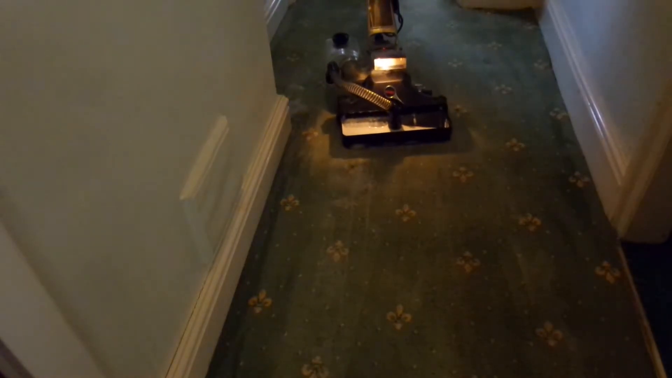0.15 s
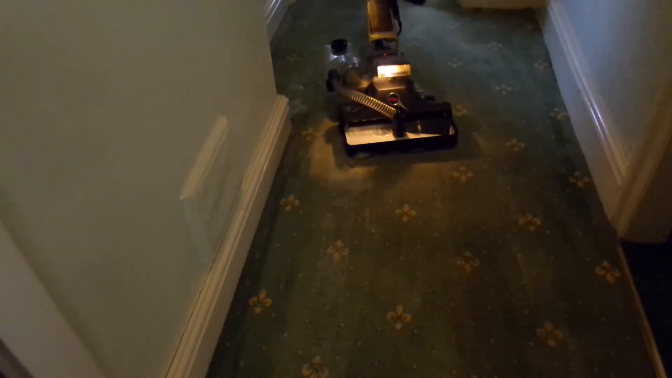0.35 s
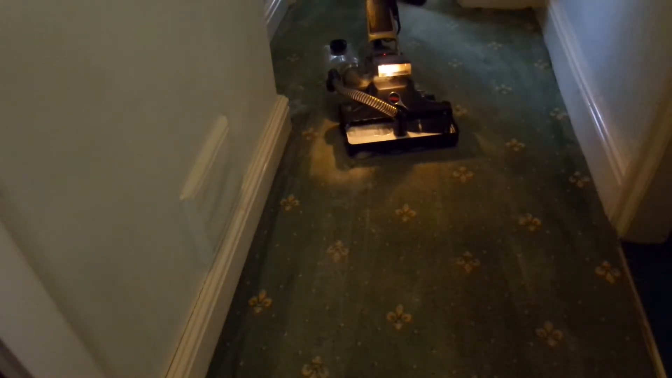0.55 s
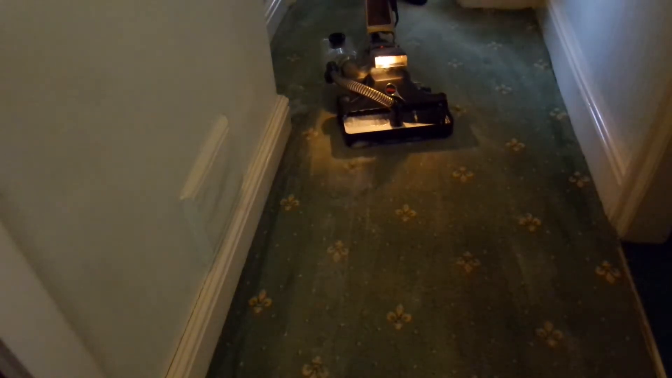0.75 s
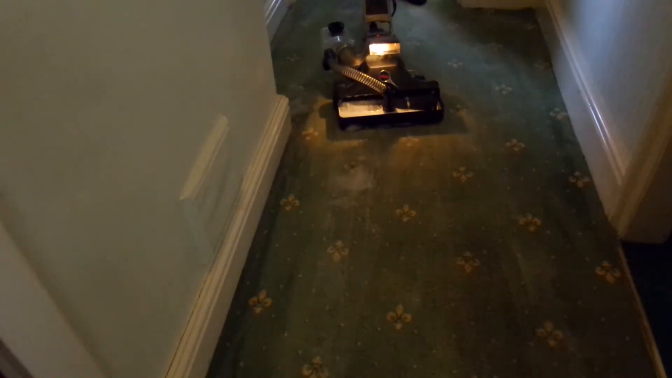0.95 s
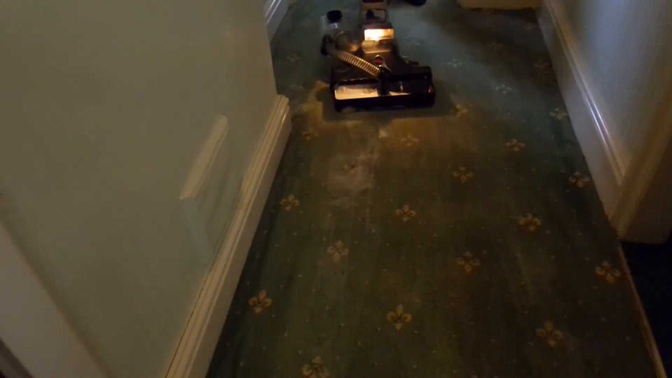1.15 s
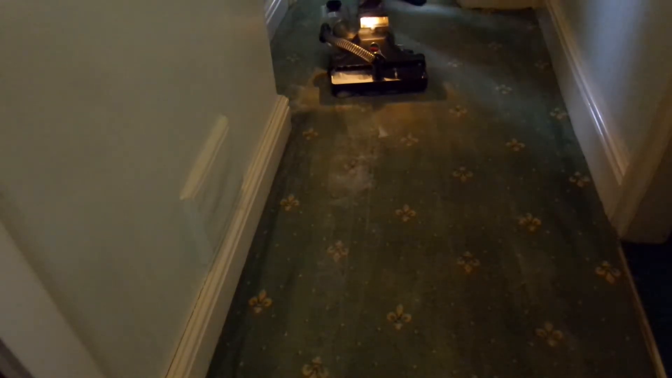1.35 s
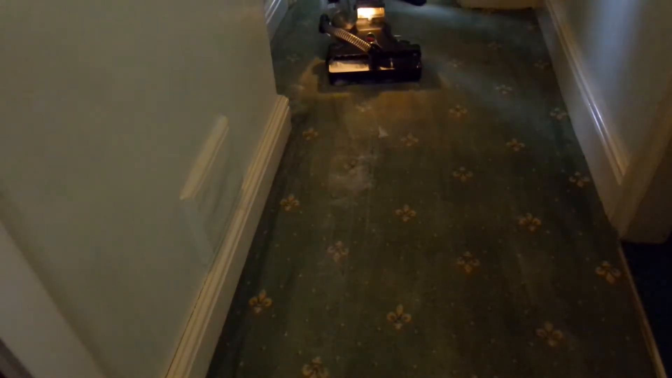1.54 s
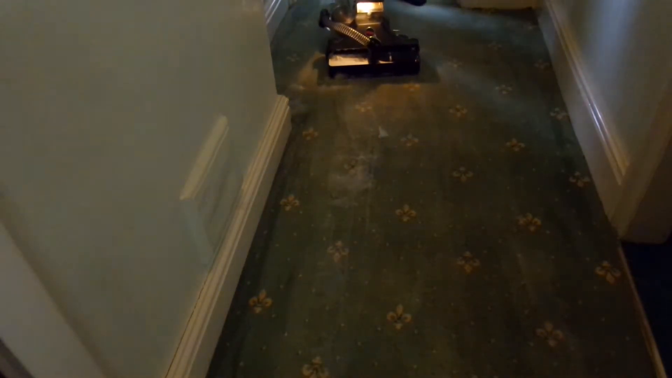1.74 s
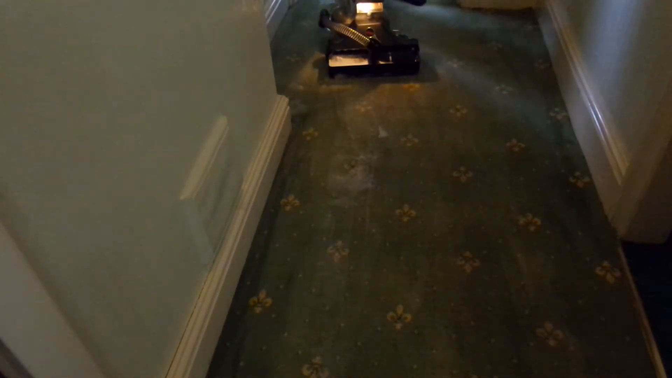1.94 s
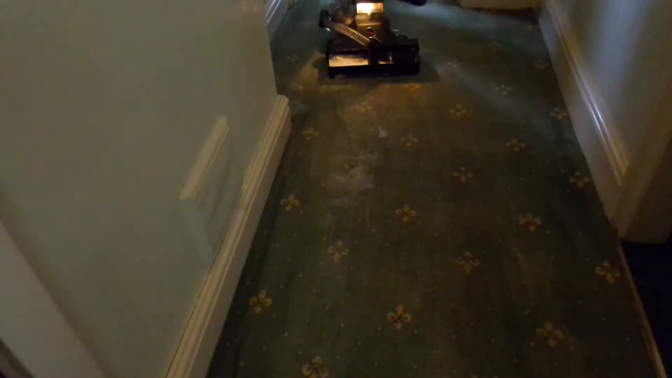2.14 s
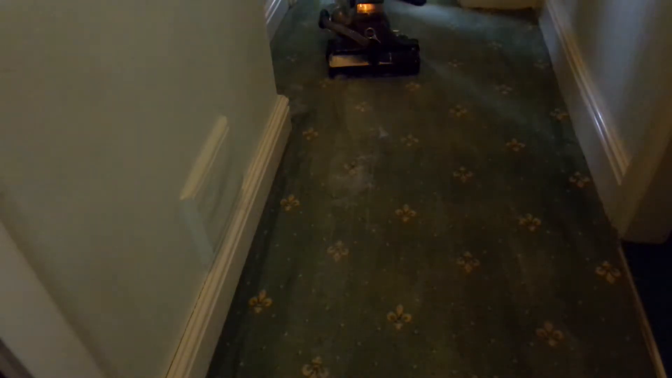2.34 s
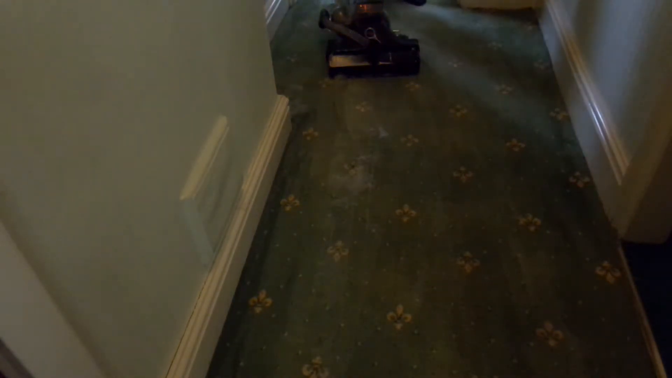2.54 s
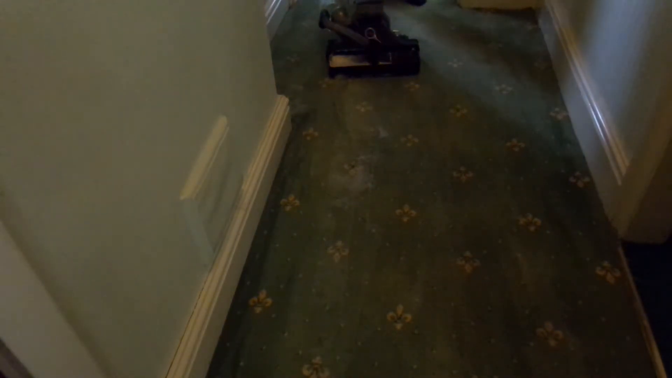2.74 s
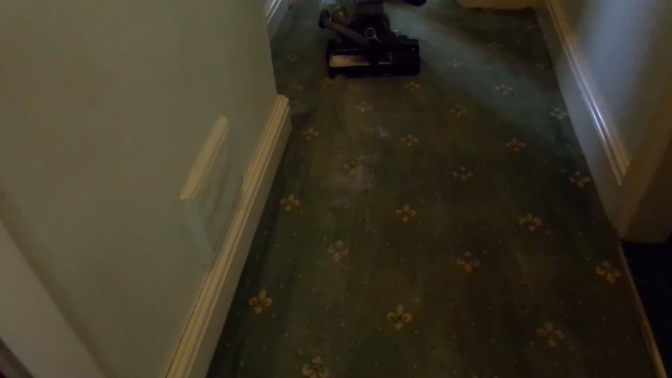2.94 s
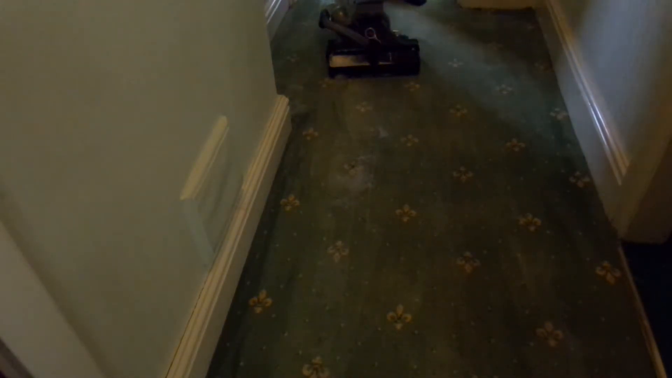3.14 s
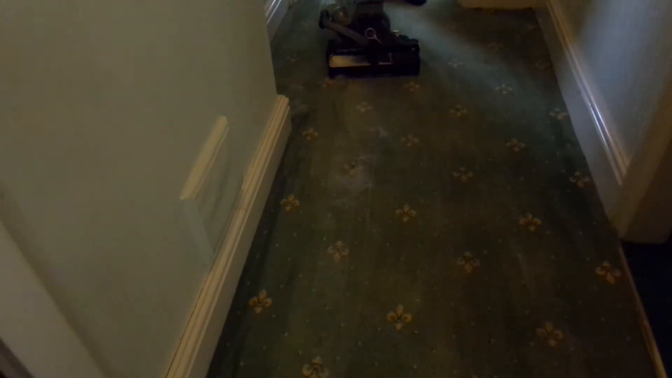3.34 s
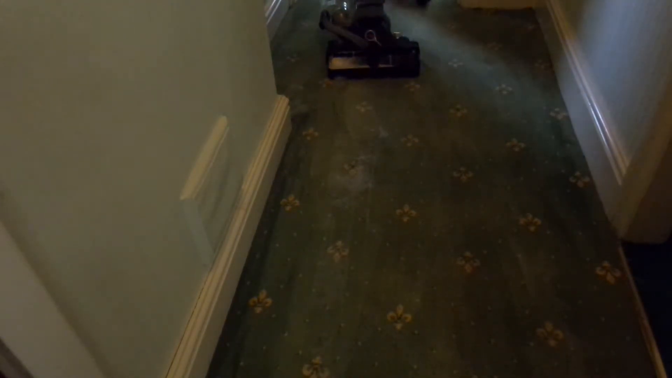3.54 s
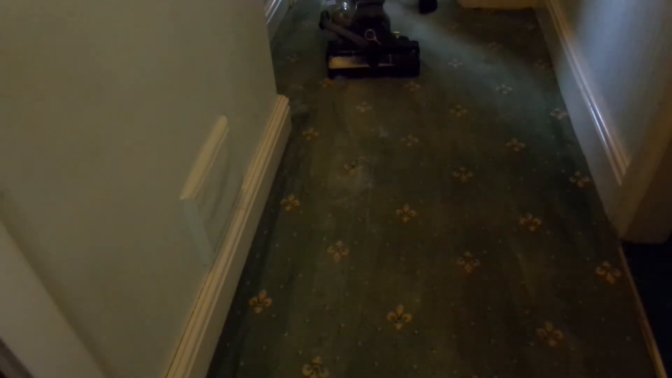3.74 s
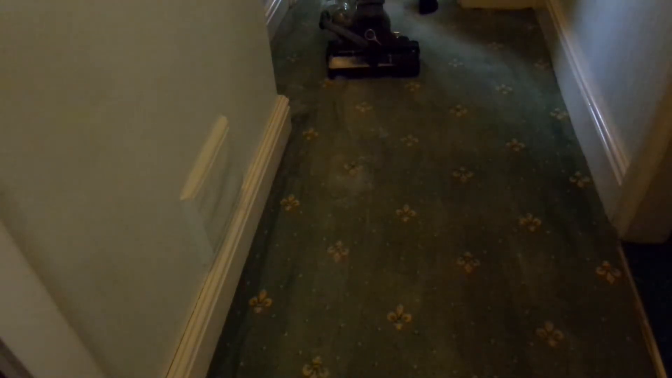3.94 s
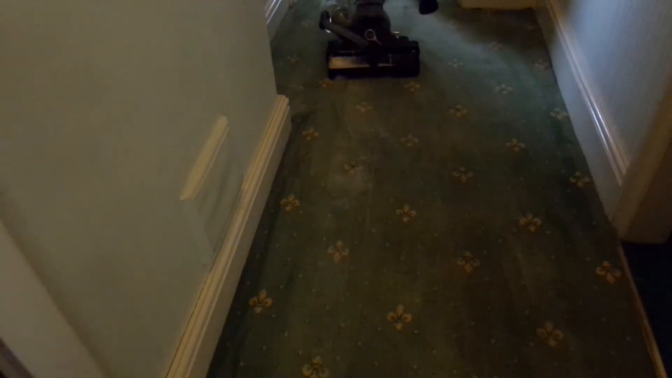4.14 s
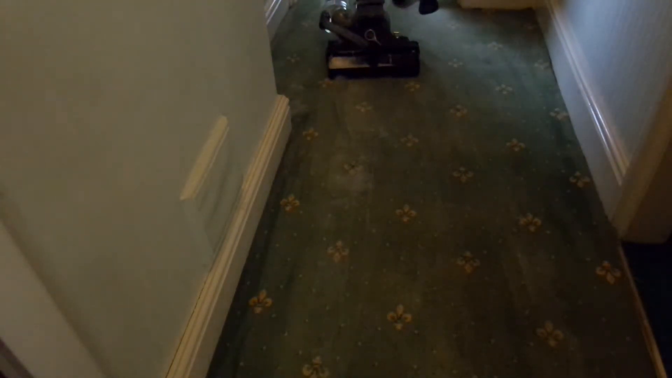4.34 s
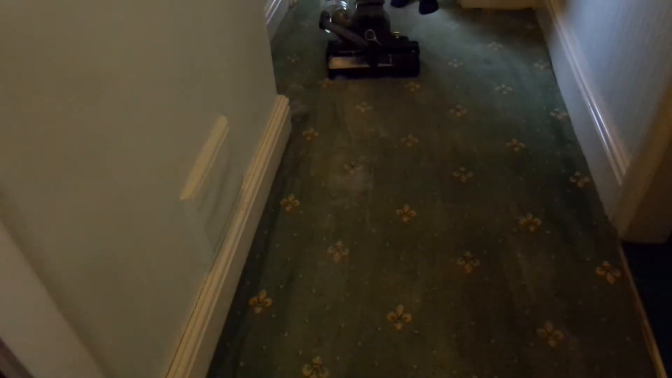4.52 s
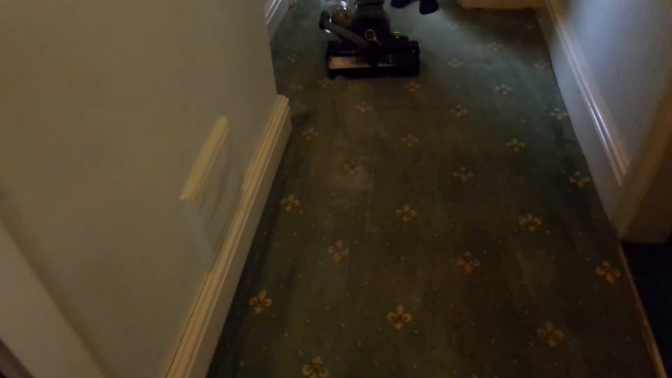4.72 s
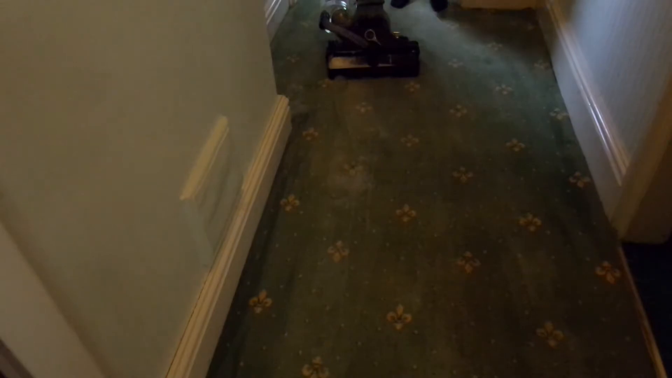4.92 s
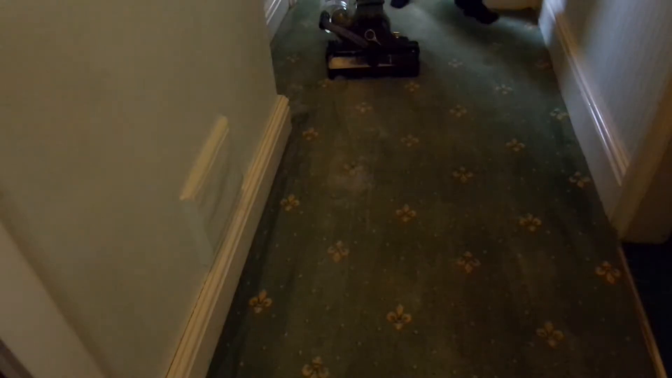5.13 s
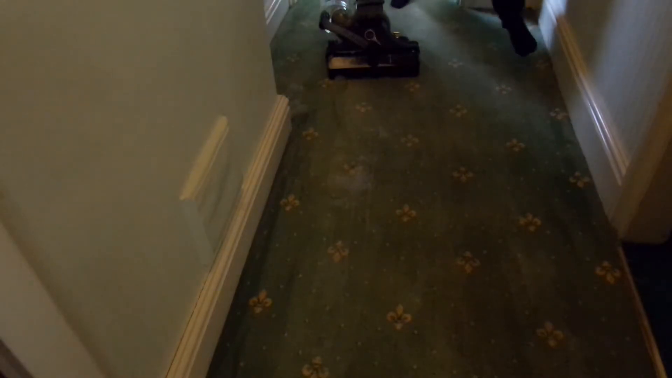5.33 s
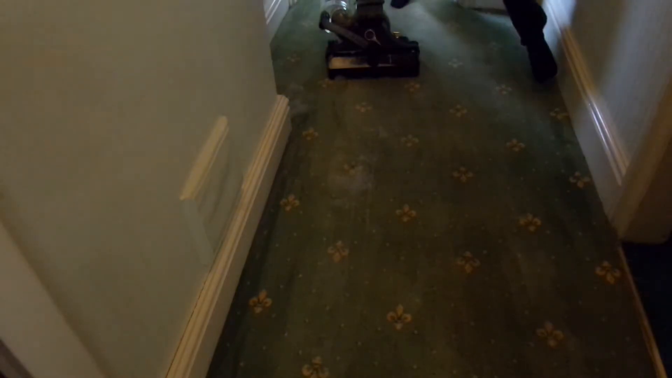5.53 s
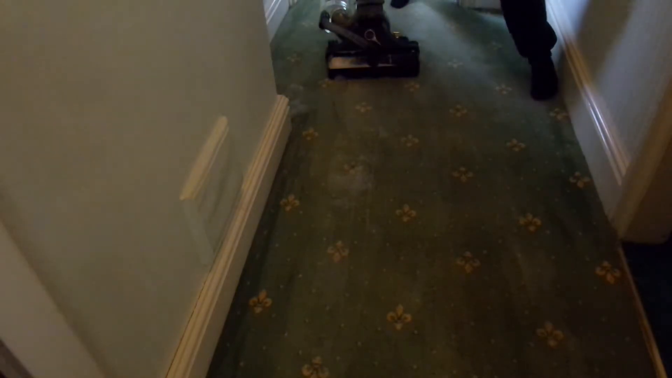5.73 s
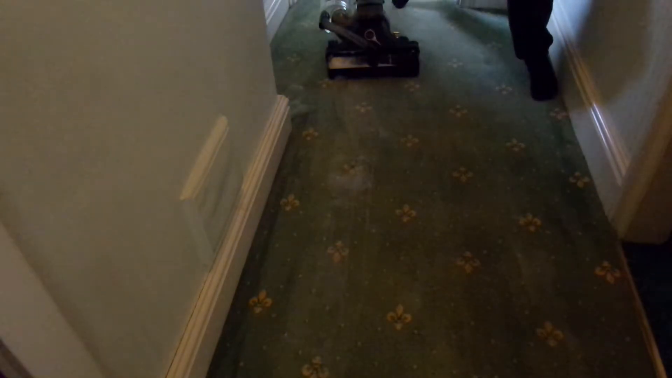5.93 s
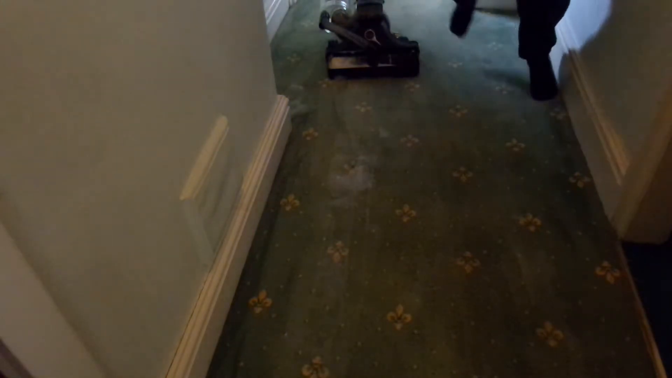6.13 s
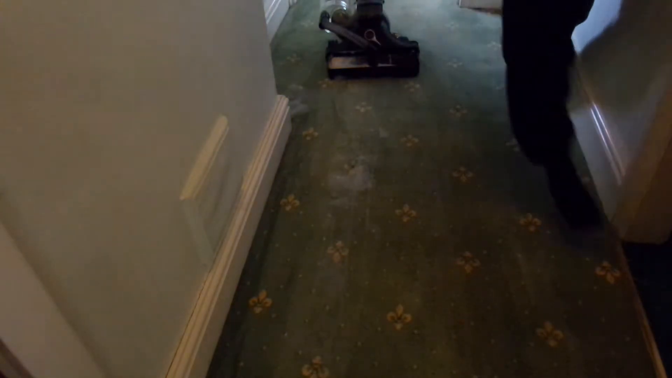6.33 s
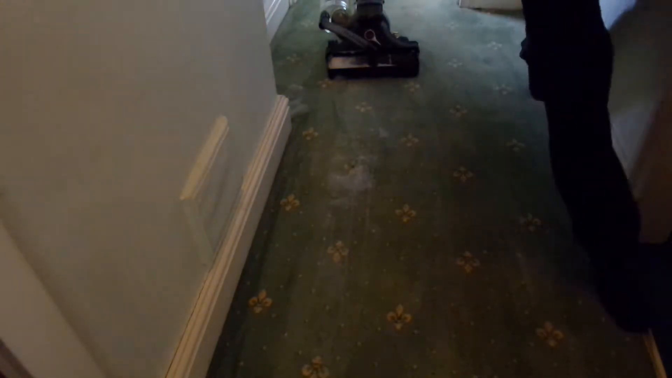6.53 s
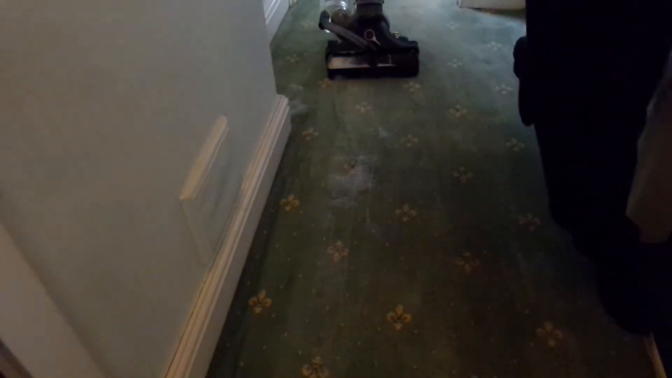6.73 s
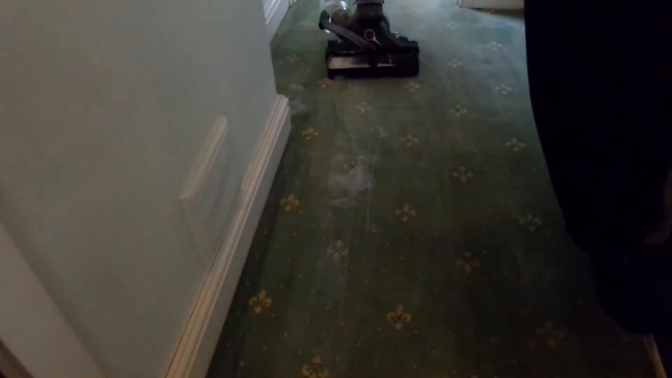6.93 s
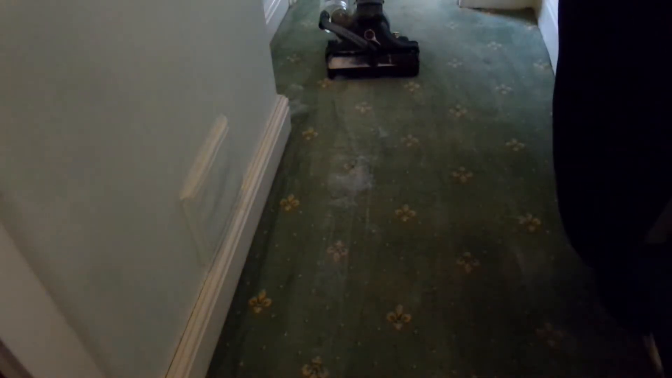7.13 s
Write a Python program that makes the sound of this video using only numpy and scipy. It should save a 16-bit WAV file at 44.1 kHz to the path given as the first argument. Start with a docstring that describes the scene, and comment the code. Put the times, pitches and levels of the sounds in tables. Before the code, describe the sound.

A vacuum cleaner rushes and whines in a hallway, then spins down, followed by plastic clacks and a few muffled approaching footsteps.

```python
"""A narrow carpeted hallway, heard from a stereo microphone that stays in one spot.
An upright vacuum cleaner works close by, air rushing under the whine of its fan and brush drive; it
moves off, is switched off and spins down. At the far end its plastic handle clatters and latches
upright. Then someone walks up the hall and past the microphone, thudding on the boards under the
carpet, cloth swishing and a small metal fitting ticking on their clothes."""
import sys
import numpy as np
from scipy import signal
from scipy.fft import rfft, irfft, next_fast_len
from scipy.io import wavfile

SR = 44100
rng = np.random.default_rng(int(sys.argv[2]) if len(sys.argv) > 2 else 0)


def store_pcm(level_fs):
    """Save levels as 16-bit WAV."""
    pcm = np.round(np.clip(level_fs, -1, 1) * 32767).astype(np.int16)
    wavfile.write(sys.argv[1], SR, np.atleast_2d(pcm).T)


N = 320607
TIME = np.arange(N) / SR
SIZE = 2 * next_fast_len(N // 2 + SR // 2, real=True)
HZ = np.maximum(np.arange(SIZE // 2 + 1) * SR / SIZE, 1)
SWITCH_OFF_S, CUTOFF_HZ = 2.19, 15900

# How alike the hall sounds on the two channels. Each row: frequency in Hz, left-right correlation.
LIKENESS = [(30, .92), (100, 0.98), (200, 1), (350, 0.84), (700, 0.69), (1400, 0.08), (2800, 0.041),
            (15000, 0.022)]
# The cleaner's treble sits to the left. Each row: frequency in Hz, left over right in dB.
CLEANER_PAN = [(60, 0.5), (120, 0), (240, -0.5), (480, -0.5), (950, 1.5), (1890, 3.5), (3770, 6),
               (7520, 8.5), (15000, 6)]
# Colour of the turbulence in the housing. Each row: frequency in Hz, relative level in dB.
AIR_COLOUR = [(25, -45), (70, -38), (100, -22), (160, -17.5), (210, -5.5), (360, -3.5), (600, -3),
              (950, -9.5), (1500, -16.5), (2600, -17), (3100, -25.5), (6000, -32), (11500, -37.5),
              (15500, -35)]


def from_db(db):
    """Decibels to amplitude."""
    return 10 ** (np.asarray(db) / 20)


def unit_mid(stereo):
    """Scale a stereo pair so that its middle has rms 1."""
    return stereo / np.sqrt(np.mean(stereo.mean(axis=0) ** 2))


def pan(db):
    """Left and right gains, the left louder by db."""
    return from_db(np.array([[.5], [-.5]]) * db)


def in_time(rows):
    """Each column of a table of timed points, sample by sample."""
    times, *columns = np.transpose(rows)
    return [np.interp(TIME, times, column) for column in columns]


def at_hz(points, hz):
    """Read a table on a log-frequency axis."""
    frequencies, values = np.transpose(points)
    return np.interp(np.log(hz), np.log(frequencies), values)


def to_sound(spectrum):
    """From a spectrum back to samples."""
    return irfft(spectrum, SIZE)[..., :N]


def drift(rate):
    """A random wander of spread 1 that turns about rate times a second."""
    knots = rng.standard_normal(2000)
    return np.interp(TIME * rate, np.arange(len(knots)), knots) / np.sqrt(2 / 3)


def response(colour, peaks=()):
    """Causal (minimum-phase) response of a body with a broad colour and resonances."""
    level_db = at_hz(colour, HZ)
    for hz, width, db in peaks:
        level_db = level_db + db / (1 + (2 * (HZ - hz) / width) ** 2)
    cepstrum = irfft(np.log(from_db(level_db)))
    cepstrum[1:SIZE // 2] *= 2
    cepstrum[SIZE // 2 + 1:] = 0
    return np.exp(rfft(cepstrum))


def diffuse():
    """Spectrum of stereo noise, white in the middle: alike on both sides in the bass, wide on top."""
    alike = np.clip(at_hz(LIKENESS, HZ), -1, 1)
    mid, side = rfft(rng.standard_normal((2, SIZE)))
    return mid + np.sqrt((1 - alike) / (1 + alike)) * side * [[1], [-1]]


def ring(hits, modes):
    """Hits (s, dB) set decaying modes (Hz, dB, t60) ringing, a little differently each time."""
    times, hit_db = np.transpose(hits)
    out, at = np.zeros(N), (times * SR).astype(int)
    for hz, db, t60 in modes:
        clicks = np.full(N, 1e-18)
        clicks[at] = from_db(hit_db + db + rng.normal(0, 1, len(at)))
        decay, angle = from_db(-60 / (t60 * SR)), 2 * np.pi * hz / SR
        out += signal.lfilter([0, np.sin(angle)], [1, -2 * decay * np.cos(angle), decay ** 2], clicks)
    return out


def contacts(rows, body):
    """Spectrum of knocks on a body: each a click and a run of slips, coloured by the part it hits."""
    force, t = np.zeros(N), TIME[:SR // 8]
    body_power = np.abs(body[::64]) ** 2
    for start, db, bright_hz, length, part_hz, part_db in rows:
        slipping = rng.random(len(t)) < 500 / SR   # about 500 slips a second
        slips = .5 * rng.standard_normal(len(t)) * slipping * np.exp(-(t / length) ** 2)
        slips[0] = 1
        soft_b, soft_a = signal.butter(2, min(bright_hz, SR / 3), fs=SR)   # soft contacts lose treble
        peak_b, peak_a = signal.iirpeak(part_hz, Q=3.3, fs=SR)
        boost_b = peak_a + (from_db(part_db) - 1) * peak_b
        colour = np.convolve(soft_b, boost_b), np.convolve(soft_a, peak_a)
        _, gain = signal.freqz(*colour, worN=len(body_power))
        energy = np.mean(body_power * np.abs(gain) ** 2) * np.sum(slips ** 2)
        at = int(start * SR)
        force[at:at + len(t)] += from_db(db) * signal.lfilter(*colour, slips) / np.sqrt(energy)
    return rfft(force, SIZE) * body


def hallway(early_db, early_s):
    """Response of the hall: a burst of early echoes between close walls, then a tail dying by band."""
    # Reverberation of the hall. Each row: frequency in Hz, t60 in seconds.
    decays = [(100, 0.43), (300, 0.26), (1000, 0.3), (3000, 0.34), (8000, 0.24), (15000, 0.22)]
    t, tail = TIME[:SR // 2], 0
    noise = rfft(to_sound(diffuse())[:, :len(t)])
    centres = np.log([hz for hz, _ in decays])
    log_hz = np.log(np.maximum(np.arange(len(t) // 2 + 1) * SR / len(t), 1))
    for weights, (_, t60) in zip(np.eye(len(centres)), decays):
        band = irfft(noise * np.interp(log_hz, centres, weights), len(t))
        tail = tail + band * from_db(-60 * t / t60)
    return rfft(tail * (1 + from_db(early_db) * np.exp(-t / early_s)), SIZE)


def echoes(sound):
    """Spectrum of a sound as the hall carries it, at the same level in the midrange."""
    hall = hallway(early_db=0, early_s=.01)
    midrange = hall[:, (HZ > 400) & (HZ < 1600)]
    return rfft(sound, SIZE) * hall / np.sqrt(np.mean(np.abs(midrange) ** 2))


def room_tone():
    """The quiet of the house: a low murmur and a faint hiss from all around."""
    # Colour of the quiet. Each row: frequency in Hz, relative level in dB.
    colour = [(25, -22), (40, -19.5), (60, -3.5), (110, -6), (180, -3.5), (290, -9), (420, -12.5),
              (600, -24), (1000, -26.5), (2000, -26), (4000, -28), (9000, -33), (16000, -26)]
    # Humps in the hiss. Each row: centre in Hz, width in Hz, boost in dB.
    peaks = [(1973, 340, 6.5), (15440, 890, 2.5)]
    return from_db(-67.5) * unit_mid(to_sound(diffuse() * response(colour, peaks) * (HZ < CUTOFF_HZ)))


def trousers():
    """Trouser legs brush past each other in soft swells of noise."""
    # Swishes. Each row: time of the peak in seconds, half length in seconds, level in dB.
    swishes = [(5.9, .025, -68), (5.99, .07, -67.5), (6.09, .03, -67), (6.785, .28, -75)]
    # Colour of rubbing cloth. Each row: frequency in Hz, relative level in dB.
    cloth = [(150, 2), (280, 19), (480, 15.5), (1100, -2), (2600, -4), (5000, -5), (15000, -10)]
    swell = sum(from_db(db) * np.exp(-((TIME - peak) / half) ** 2) for peak, half, db in swishes)
    return swell * from_db(1.8 * drift(27)) * unit_mid(to_sound(diffuse() * response(cloth)))


def metal_fitting():
    """A small fitting on the clothes ticks and rebounds, close to the microphone on the left."""
    # Ticks. Each row: start in seconds, relative level in dB.
    ticks = [(6.4015, -52), (6.469, -51.5), (6.536, -46), (6.602, -47.5), (6.6692, -46), (6.7475, -50),
             (6.7588, -48.5), (6.7775, -53), (6.7976, -50), (6.952, -50), (7.0982, -52)]
    # Modes of the metal. Each row: frequency in Hz, relative level in dB, t60 in seconds.
    modes = [(2130, -12, 0.02), (4100, -5, 0.0072), (4730, -4, 0.012), (5240, -3, 0.0056),
             (7300, -11, 0.0033)]
    rebounds = np.array(ticks) + [0.03, -13]   # seconds later, dB softer
    return from_db(-2.5) * ring(np.vstack([ticks, rebounds]), modes) * pan(10)


def joists(booms):
    """Each footfall sets the floor booming, with a pitch and a decay that depend on where it lands."""
    # Modes of the floor. Each row: multiple of the boom pitch, relative level in dB.
    modes = [(0.998, 0), (1.24, -12.5)]
    out, t = np.zeros(N), TIME[:SR // 4]
    for start, db, hz, t60 in booms:
        boom = sum(from_db(level) * np.sin(2 * np.pi * k * hz * t) for k, level in modes)
        attack = 1 - np.exp(-t * hz)   # it swells over the first cycle
        at = int(start * SR)
        out[at:at + len(t)] += from_db(db - 60 * t / t60) * attack * boom
    return signal.sosfilt(signal.butter(2, 70, "high", fs=SR, output="sos"), out)


def loose_board():
    """The step nearest the microphone sets a loose board ringing."""
    # The blow on the board. Its row: start in seconds, level in dB.
    blow = [(6.541, -39.5)]
    # Modes of the board. Each row: frequency in Hz, relative level in dB, t60 in seconds.
    modes = [(345, -2, .25), (571, -3, .22), (743, 0, .22), (1010, 0, .22), (1290, -17, .15),
             (1630, -16, .1)]
    return ring(blow, modes)


def footsteps():
    """Each step is a heel, a sole and the carpeted boards settling under the weight; the joists boom."""
    # Footfalls. Each row: start in seconds, heel in relative dB, heel brightness in Hz, gap to the sole
    # in seconds, sole in relative dB, board resonance in Hz, its boost in dB, boom level in dB,
    # boom pitch in Hz, boom t60 in seconds.
    steps = [(4.393, -48, 400, 0.00614, -50.5, 267, 9, -49, 259, 0.43),
             (4.588, -70, 200, .008, -75, 150, 3, -53, 126, 0.38),
             (4.732, -37, 419, 0.0074, -29.5, 424, 8, -21, 132, 0.19),
             (4.882, -55, 220, 0.0091, -54, 272, 6, -35, 121, 0.16),
             (4.925, -46, 330, .012, -55.5, 288, 5.5, -47, 233, 0.11),
             (5.884, -62, 400, .06, -58.5, 275, 7, -57.5, 271, .15),
             (6.18, -70, 180.4, 0.0061, -74, 160, 0, -50, 165, 0.11),
             (6.540, -32, 1170, 0.018, -29, 215.7, 3.5, -25.5, 211, 0.13),
             (6.776, -55, 233, 0.0065, -57, 199, 9, -53, 192, 0.12),
             (6.83, -57, 418, 0.0061, -63, 249, 8.5, -45, 124, .15),
             (6.892, -60, 221, .006, -67, 232, -6, -51, 112, 0.23)]
    # Colour of the carpeted boards. Each row: frequency in Hz, relative level in dB.
    boards = [(25, -26), (60, -10.5), (120, -7), (230, -1.5), (320, -3), (420, -8), (580, -9), (720, -10.5),
              (1000, -9), (1400, -12.5), (2000, -15.5), (4000, -14), (8000, -12), (15500, 0)]
    sole_hz, heel_roll, sole_roll = 476, 0.059, 0.89   # rolls: contact lengths as shares of the gap
    settle_after_s, settle_loss_db, settle_hz, settle_s = 0.042, 12.5, 497.4, 0.033
    touches, booms = [], []
    for start, heel_db, heel_hz, gap, sole_db, board_hz, board_db, *boom in steps:
        heel = (start, heel_db, heel_hz, heel_roll * gap)
        sole = (start + gap, sole_db, sole_hz, sole_roll * gap)
        settle = (start + settle_after_s, sole_db - settle_loss_db, settle_hz, settle_s)
        touches += [(*touch, board_hz, board_db) for touch in (heel, sole, settle)]
        booms.append((start + gap, *boom))
    thuds = contacts(touches, response(boards)) * hallway(early_db=4.5, early_s=0.0026)
    return from_db(-1.5) * to_sound(thuds) + joists(booms) + loose_board()


def squeaks():
    """Plastic rubs on plastic, driving a narrow resonance and its octave that bend as the parts slide."""
    # Rubs. Each row: start and length in seconds, first, middle and last pitch in Hz, relative dB.
    rubs = [(3.357, 0.062, 1150, 1090, 1070, -41), (3.426, .065, 1070, 1000, 1070, -35),
            (3.496, .05, 2800, 2570, 2140, -47), (3.505, 0.127, 1790, 1855, 1840, -41.5),
            (3.538, .06, 1110, 1045, 1090, -31.5), (3.841, 0.059, 2180, 1800, 1410, -64),
            (3.857, .06, 1080, 1060, 1030, -58), (3.944, 0.1, 1086, 1053, 1055, -47),
            (4.094, 0.051, 1050, 1080, 1050, -55), (4.29, 0.074, 840, 900, 970, -70)]
    out, width_hz = np.zeros(N), 140
    for start, length, *pitches, db in rubs:
        along = np.clip((TIME - start) / length, 0, 1)
        phase = 2 * np.pi * np.cumsum(np.interp(along, [0, .5, 1], pitches)) / SR
        grip = (1 + .5 * drift(width_hz)) * np.cos(phase) + .5 * drift(width_hz) * np.sin(phase)
        octave = from_db(-21) * drift(width_hz) * np.cos(2 * phase)
        out += from_db(db) * np.sin(np.pi * np.sqrt(along)) * (grip + octave)
    return out


def handle():
    """Hollow plastic parts knock and squeak at the far end of the hall, and the wand tube rings."""
    # Contacts of handle and latch. Each row: start in seconds, relative level in dB, brightness in Hz,
    # chatter in seconds, resonance of the part in Hz, its boost in dB, ring of the tube in relative dB.
    clacks = [(3.324, -41.5, 3200, 0.0037, 1230, 5, -49), (3.348, -33.5, 7850, 0.027, 3300, 9, -55),
              (3.378, -35, 8000, 0.02, 10600, 0, -24), (3.396, -42, 14200, 0.0071, 3970, 7, -38),
              (3.408, -33.5, 4200, 0.015, 1650, 5, -41), (3.436, -33.5, 3580, 0.021, 1005, 5, -33),
              (3.497, -36, 3300, 0.025, 2700, 3.5, -40), (3.543, -33, 2000, 0.0053, 1070, 1.5, -22),
              (3.556, -37.5, 2500, 0.0082, 2230, 9.5, -34), (3.607, -43, 2170, 0.0024, 1500, -7, -32),
              (3.69, -47.5, 7000, 0.0078, 7160, 6.5, -56), (3.842, -58, 3220, 0.008, 2000, 13, -69),
              (3.865, -49.5, 1700, 0.17, 870, 1, -55), (3.941, -42, 9100, 0.0058, 206, 9, -48),
              (3.955, -36.5, 8050, 0.051, 1210, 4.5, -32), (4.008, -45, 2200, .037, 850, 5, -43),
              (4.103, -54.5, 3200, 0.03, 1400, 1, -54), (4.31, -65, 2200, 0.088, 1600, 13, -80)]
    # Colour of the plastic. Each row: frequency in Hz, relative level in dB.
    plastic = [(40, -11), (120, -10.5), (330, -9), (520, 3), (680, -5.5), (950, -0.5), (1400, 0),
               (1900, -4.5), (2800, -12.5), (4200, -18), (6500, -22.5), (11000, -19), (15500, -14)]
    # Resonances of the hollow parts. Each row: centre in Hz, width in Hz, gain in dB.
    hollows = [(520, 90, -2.5), (800, 90, 3.5), (1070, 130, 3.5)]
    # Modes of the wand tube. Each row: frequency in Hz, relative level in dB, t60 in seconds.
    tube_modes = [(1030, -10, .058), (1070, -2.5, .12), (1850, -17, .22)]
    clacks = np.array(clacks)
    knocks = from_db(-3) * contacts(clacks[:, :6], response(plastic, hollows))
    tube = rfft(ring(clacks[:, [0, 6]], tube_modes), SIZE)
    hall = hallway(early_db=-7.5, early_s=0.024) * pan(.4 * at_hz(CLEANER_PAN, HZ))
    clatter = to_sound((knocks + from_db(-47) * tube) * hall + from_db(-13) * tube)
    squeal = squeaks()
    return clatter + from_db(-5.5) * squeal + from_db(-2) * to_sound(echoes(squeal))


def switched_off():
    """0 while the motors are driven, 1 while they coast."""
    return np.clip((TIME - SWITCH_OFF_S) / .06, 0, 1)


def coasting(drag_s, stop_s, lag_s=0):
    """Share of full speed: 1 until the switch is thrown, then air drag and friction stop the shaft."""
    t = np.maximum(TIME - SWITCH_OFF_S - lag_s, 0)
    friction = np.exp(-stop_s / drag_s)
    return np.maximum((np.exp(-t / drag_s) - friction) / (1 - friction), 1e-4)


def shaft_tone(speed, multiple, scatter, scatter_rate=14, lag_s=0.0001):
    """A tone of rms 1 locked to a shaft, lag_s later on the left; the walls add a wandering copy."""
    roughness = 1 + .006 * switched_off() * drift(70)   # the pitch turns rough while coasting
    hz = multiple * (speed + 0.694 * drift(25)) * roughness
    phase = 2 * np.pi * (np.cumsum(hz) / SR - hz * lag_s * np.array([[1], [0]]))
    shared, left, right = [drift(scatter_rate) + 1j * drift(scatter_rate) for _ in range(3)]
    alike = np.clip(at_hz(LIKENESS, multiple * speed[0]), 0, 1)
    wander = scatter * (np.sqrt(alike) * shared + np.sqrt(1 - alike) * np.array([left, right]))
    return ((1 + wander.real) * np.cos(phase) + wander.imag * np.sin(phase)) / np.sqrt(.5 + scatter ** 2)


def housing(tones):
    """Coasting tones sweep the housing's resonances, trailed by echoes; it is too small to give bass."""
    # Resonances of the housing. Each row: centre in Hz, width in Hz, gain in dB.
    peaks = [(350, 30.4, 5.5), (437, 45, 10.5), (550, 35, 5), (640, 80, -2), (776, 76, 8.5), (1080, 110, 1)]
    off, flat = switched_off(), [(20, 0), (20000, 0)]
    falling = from_db(-2.5) * rfft(tones * off, SIZE) + from_db(-8) * echoes(tones * off)
    heard = tones * (1 - off) + to_sound(falling * response(flat, peaks))
    return signal.sosfilt(signal.butter(4, 325, "high", fs=SR, output="sos"), heard)


def brush_drive(running, far):
    """The brush drive sings on multiples of its speed, in a different balance once it coasts."""
    # Its tones. Each row: multiple of the speed, relative dB while driven, relative dB while coasting.
    orders = [(2, 4, 4), (3, -8, 3), (4, -2, 0), (6, -12, -3.5), (8, -14, 1), (9, -11, -14)]
    # Whistles that swell and sink in turn. Each row: time in seconds, then full-speed level in dB
    # at five, seven and eight times the speed.
    whistle_levels = [(0, -43.5, -41, -49.5), (.42, -39, -43, -40.5), (.68, -40, -34.5, -42.5),
                      (.93, -38.5, -38, -47), (1.15, -32.5, -35.5, -42.5), (1.42, -36.5, -38, -46.5),
                      (1.6, -32, -44.5, -50), (2.2, -32, -43.5, -48.5)]
    share, off = coasting(drag_s=3.5, stop_s=1.35), switched_off()
    speed = running * share
    tones = sum(from_db(driven + off * (free - driven)) * shaft_tone(speed, k, .25, scatter_rate=75)
                for k, driven, free in orders)
    whistles = sum(from_db(db) * shaft_tone(speed, k, scatter=.18)
                   for k, db in zip((5, 7, 8), in_time(whistle_levels)))
    return (tones * from_db(-32.5 + .5 * far) + whistles) * share ** 1.9


def fan_whine(running, share):
    """The whine at three times the fan speed swells and sinks as the cleaner moves."""
    # Swell of the whine. Each row: time in seconds, relative level in dB.
    swell = [(0.0, -43), (0.14, -27), (.5, -25), (1.13, -23), (1.26, -28), (1.32, -43), (1.5, -33.5),
             (2.02, -43), (2.2, -31)]
    swell_db, = in_time(swell)
    speed = running * share
    # the falling whine carries better as it enters the range that the housing favours
    carry_db = at_hz(AIR_COLOUR, 3 * speed) - at_hz(AIR_COLOUR, 3 * running)
    return from_db(swell_db + carry_db - 1) * share ** 2.45 * shaft_tone(speed, 3, scatter=.2) * pan(2.2)


def fan_whistles(running, share, rush_db):
    """The eleven blades whistle thinly among weaker fan tones; all sink under the air as it slows."""
    # Whistle of the blades. Each row: time in seconds, full-speed level in dB.
    blade_levels = [(0, -55.5), (.2, -43), (.45, -55.5), (.7, -49.5), (1.0, -56.5), (1.5, -51.5),
                    (2.2, -56)]
    # Weak tones of the motor. Each row: multiple of the speed, relative level in dB.
    orders = [(.496, -15), (4, -22), (6, -27), (8, -35)]
    # A whistle that is strongest with the cleaner near. Each row: time in seconds, full-speed dB.
    whistle_levels = [(0, -42), (.55, -39.5), (.9, -48.5), (1.8, -50.5), (2.2, -43)]
    speed = running * share
    blades = from_db(in_time(blade_levels)[0]) * shaft_tone(speed, 11, scatter=.3, lag_s=0) * pan(3)
    weak = sum(from_db(db) * shaft_tone(speed, k, scatter=.5, scatter_rate=9) for k, db in orders)
    whistle = from_db(in_time(whistle_levels)[0]) * shaft_tone(speed, 5.49, scatter=.25)
    return (blades + whistle) * share ** 6 + weak * from_db(rush_db + 1) * share ** 2


def airflow(levels_db):
    """Five bands of turbulence, through duct and hall resonances that change as the cleaner moves off."""
    # Resonances near the microphone. Each row: centre in Hz, width in Hz, gain in dB.
    near_peaks = [(143, 25, -7.5), (180, 25, 7.5), (266.4, 18, 5), (317.5, 18, 10), (374, 47, 6),
                  (423.5, 40, 10.5), (480, 25, -4), (528.7, 18, 9.5), (584, 26, 5.5), (622, 66, 3),
                  (686.5, 11, 7), (754, 30, -4.5), (786, 20, 7.5), (880, 19, 12.5), (915, 23, 4),
                  (4400, 300, 1)]
    # Resonances at the far end. Each row: centre in Hz, width in Hz, gain in dB.
    far_peaks = [(221.6, 14, 3), (270.5, 22, 5), (321, 21, 8.5), (362.5, 34, 12), (421.6, 18, 10),
                 (451, 27, 6.5), (508, 16, 6), (559.2, 26, 12), (636, 26, -5.5), (717, 18, 5), (771, 36, 6),
                 (856, 28, 3.5), (920, 26, 10), (950, 16, 5), (1040, 18, 3), (1350, 25, 1.5),
                 (2150, 300, 1), (3790, 130, 5.5), (4150, 160, 3.5), (4600, 130, 3)]
    noise = diffuse() * pan(at_hz(CLEANER_PAN, HZ))
    near, far = noise * response(AIR_COLOUR, near_peaks), noise * response(AIR_COLOUR, far_peaks)
    away = np.interp(TIME, [1.3, 1.45], [0, 1])
    edges_hz, out = [0, 160, 600, 1400, 3000, 16000], 0
    for low, high, db in zip(edges_hz, edges_hz[1:], levels_db):
        inside = (HZ >= low) & (HZ < high)
        band = (1 - away) * unit_mid(to_sound(near * inside)) + away * unit_mid(to_sound(far * inside))
        out = out + band * from_db(db + .5 * drift(14))
    return out


def vacuum_cleaner():
    """Rushing air with the tones of fan and brush; each follows a power of the speed as it runs down."""
    # Both motors speed up a little as the push on the carpet turns into a pull.
    # Each row: time in seconds, then fan and brush drive speeds in turns per second.
    speeds = [(.5, 408.9, 208.5), (.8, 412, 212.6), (1.2, 415, 214), (1.6, 414.3, 213.2)]
    # The stroke along the hall. Each row: time in seconds, distance from 0 (nearest) to 1 (farthest).
    stroke = [(0, 0.35), (.4, 0.12), (.9, 0.017), (1.5, 0.75)]
    # Rumble, roar, rush, hiss and sizzle of the air. Each row: full-speed level in dB, power of the
    # speed that it follows, gain at the far end in dB.
    air_bands = [(-45, 1.08, 4.5), (-17, 2.18, -1), (-23.5, 2.19, 0.5), (-33.5, 1.34, -1),
                 (-40.5, 1.2, 0.6)]
    # Swell of the hiss. Each row: time in seconds, gain in dB.
    hiss_swell = [(0, -0.5), (.45, -0.5), (.85, -1.2), (1.25, -1.2), (1.6, -1.3), (2.0, 0.4), (2.4, -3)]
    fan_speed, brush_speed = in_time(speeds)
    far, = in_time(stroke)
    drag_s, stop_s = 1.12, 1.65
    share = coasting(drag_s, stop_s)
    flow_db = 20 * np.log10(coasting(drag_s, stop_s, lag_s=0.015))   # the air outlasts the fan a moment
    air_db = [db + power * flow_db + far_db * far for db, power, far_db in air_bands]
    air_db[3] += in_time(hiss_swell)[0]
    hum = from_db(-18 - 10 * far) * share ** 3.9 * shaft_tone(fan_speed * share, 1, .28, scatter_rate=30)
    whine = fan_whine(fan_speed, share)
    whistles = fan_whistles(fan_speed, share, rush_db=air_db[2])
    return airflow(air_db) + hum + whistles + housing(whine + brush_drive(brush_speed, far))


def scene():
    """The cleaner, its handle and the walker over the quiet of the house."""
    quiet = room_tone()
    return vacuum_cleaner() + handle() + footsteps() + trousers() + metal_fitting() + quiet


def record(dry):
    """The top treble is cut steeply."""
    return signal.sosfilt(signal.ellip(12, .1, 80, CUTOFF_HZ, fs=SR, output="sos"), dry)


dry = scene()
out = record(dry)
store_pcm(out)
```